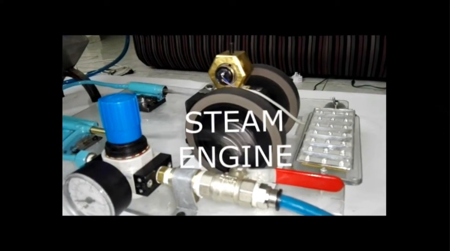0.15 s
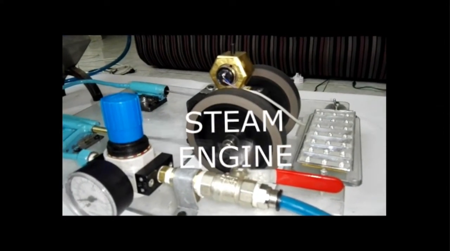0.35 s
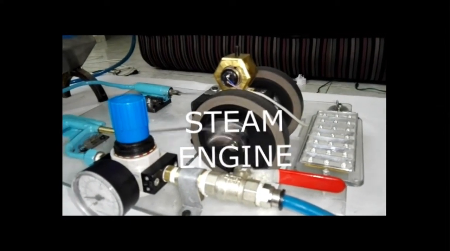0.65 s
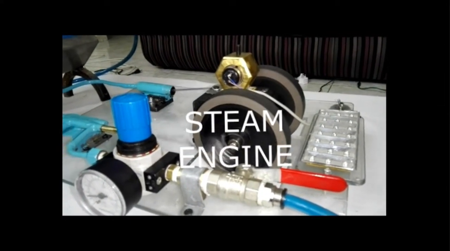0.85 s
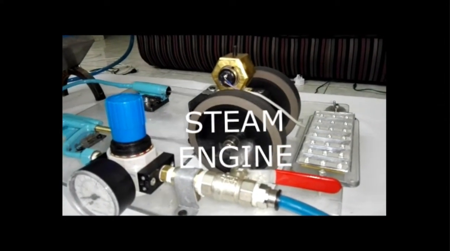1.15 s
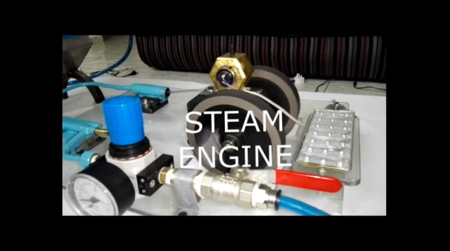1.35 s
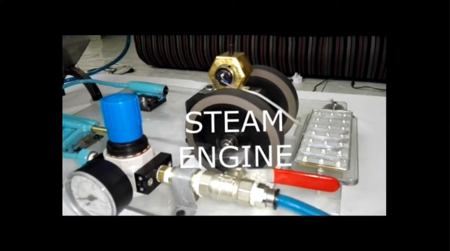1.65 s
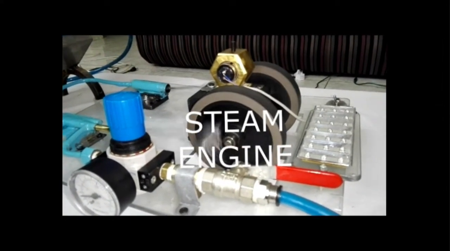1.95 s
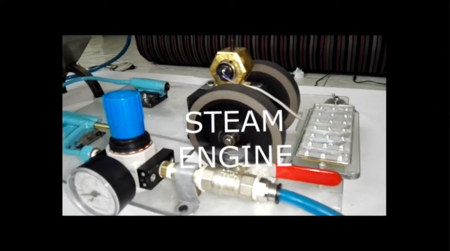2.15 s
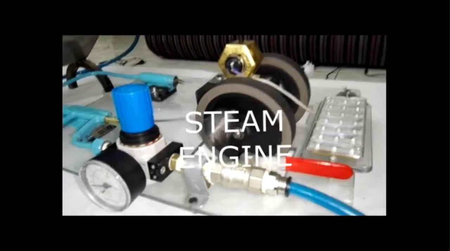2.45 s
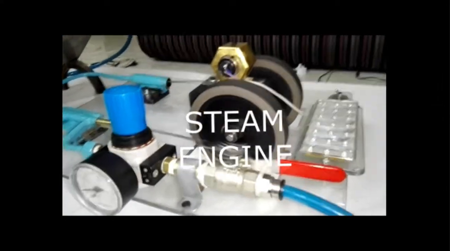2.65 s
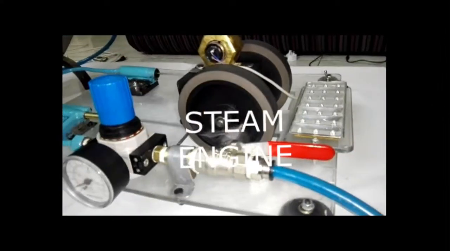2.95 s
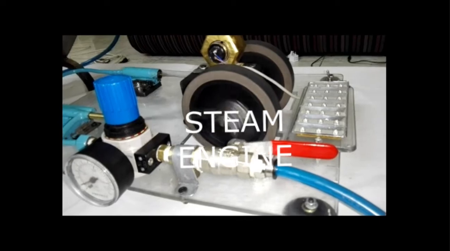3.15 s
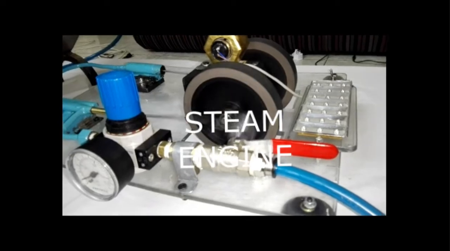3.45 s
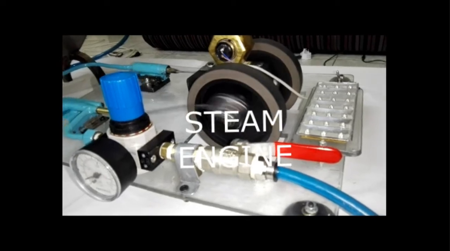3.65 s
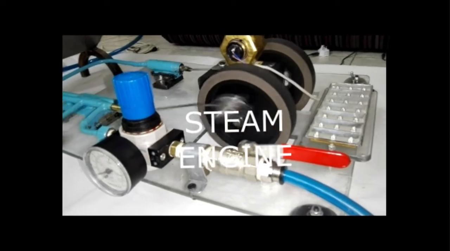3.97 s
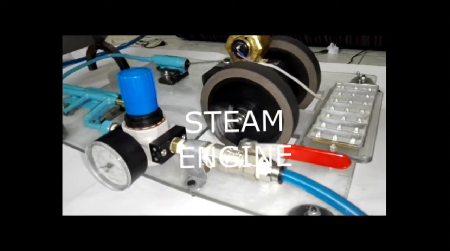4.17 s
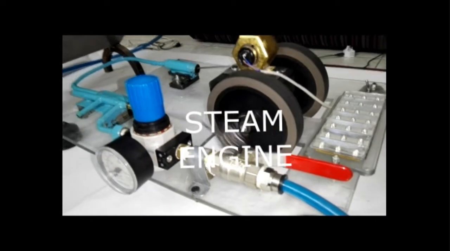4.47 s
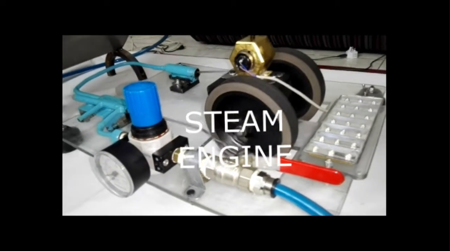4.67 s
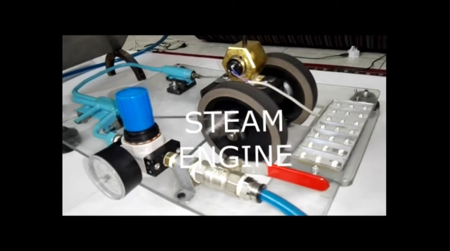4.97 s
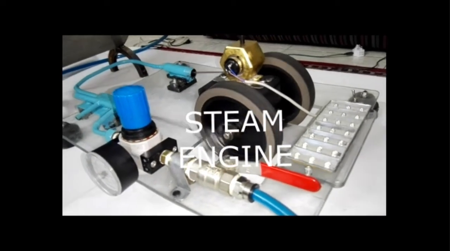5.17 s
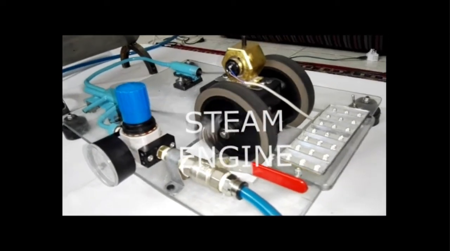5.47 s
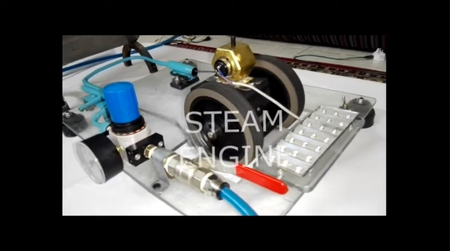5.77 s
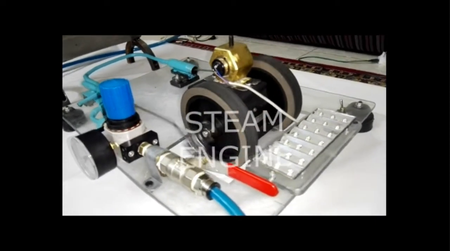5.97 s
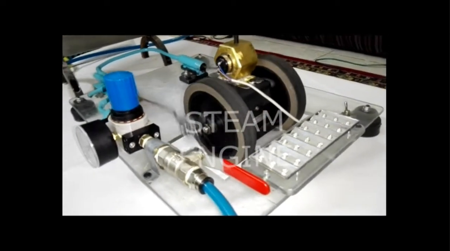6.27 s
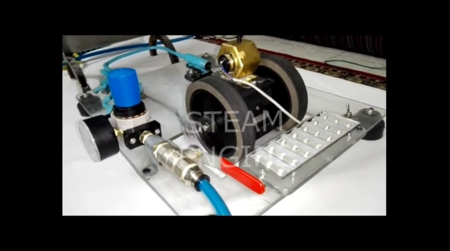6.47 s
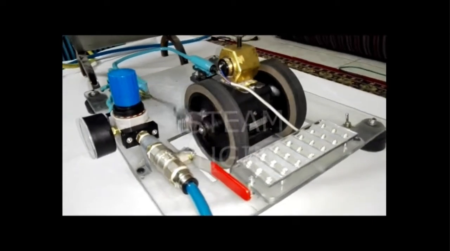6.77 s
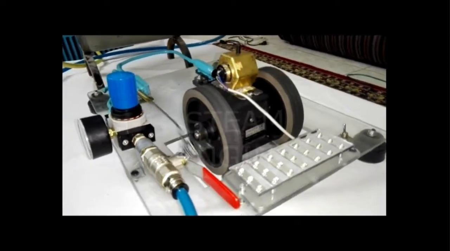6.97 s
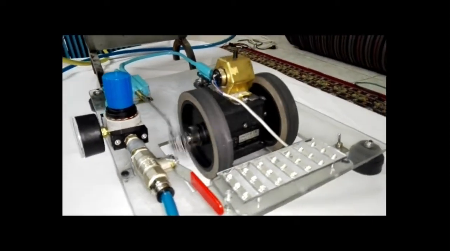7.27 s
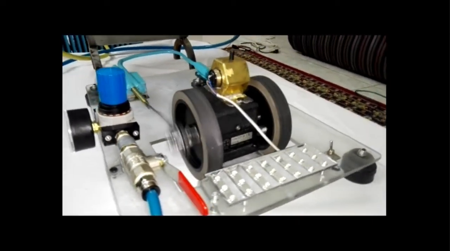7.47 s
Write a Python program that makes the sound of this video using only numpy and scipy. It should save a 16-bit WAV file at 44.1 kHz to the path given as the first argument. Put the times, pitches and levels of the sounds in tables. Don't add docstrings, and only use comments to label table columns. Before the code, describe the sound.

Close up on a table in a small room, a miniature piston engine runs fast, each turn a tick, a hissing puff and a tock, with a loud deep compressor hum and air leak. Before three seconds a hard cut removes the hum; the engine continues slower, about six puffs a second, with crisp knocks, light rattle and faint hiss, until the end.

```python
import sys
import numpy as np
from scipy import signal
from scipy.fft import rfft, irfft
from scipy.io import wavfile
from scipy.ndimage import uniform_filter1d

SR = 44100
rng = np.random.default_rng(int(sys.argv[2]) if len(sys.argv) > 2 else 0)


def invert_db(x):
    u = np.asarray(x, float) / 20
    return 10 ** u


def digitize_waveform(pressure):
    field = np.atleast_2d(pressure).T
    bounded = np.clip(field, -1, 1)
    quanta = np.round(bounded * 32767).astype(np.int16)
    wavfile.write(sys.argv[1], SR, quanta)


N = 336042

CHANGE_S, CHANGE_FADE_S = 2.643, 0.011

# (multiple of the shaft speed, level [dB rms]); the high ones are its casing ringing
HUM = [(1, -20), (2, -35.5), (4, -46.5), (5, -51.5), (6, -56.5), (8, -55), (18, -51.5), (21, -52),
       (22, -54), (26, -43), (27, -50), (28, -51), (29, -44.5), (30, -56)]
HUM_HZ, HUM_START_TURN, HUM_LAG_RAD = 59.54, .393, .5
# (frequency [Hz], level [dB per Hz])
FAST_RUMBLE = [(15, 9), (45, -1), (90, 3), (130, -5), (200, -14), (300, -59)]
SLOW_RUMBLE = [(12, -16), (25, -5.5), (60, -3.5), (130, -2), (200, -6), (300, -17.5), (400, -40)]
FAST_RUMBLE_DB, SLOW_RUMBLE_DB = -35.5, -43
# (frequency [Hz], level [dB per Hz])
FAST_LEAK = [(88, -31), (150, -1), (171, 0.5), (241, -9), (637, -13), (816, -14.5), (1420, -0.5),
             (1650, -3), (2920, -11), (3810, -12), (4690, -8.5), (9490, -12.5), (14200, -20.5)]
SLOW_LEAK = [(150, -47), (250, -14.5), (553, -11), (633, -36), (802, -18), (949, -14.5), (1350, -10),
             (1630, -2), (1960, -9), (2100, -27), (3200, -14), (6620, -12), (9760, -13), (14200, -20)]
FAST_LEAK_DB, SLOW_LEAK_DB = -33, -37.5
# (time [s], level [dB])
WHINE = [(4.8, -80), (5.5, -62), (6.8, -56), (7.6, -57)]
WHINE_HZ = 807

# (first tick [s], number of ticks, [(turn number, length of a turn [ms])])
FAST_WHEEL = (-.0287, 22, [(0, 129.1), (12, 128.0), (20, 127.93)])
SLOW_WHEEL = (2.6379, 32, [(0, 161.5), (4, 161.65), (9, 161.45), (13, 160.9), (15, 160.35), (20, 159.9),
              (30, 159.78)])
# (time [s], tick [dB], tock [dB], puff [dB])
FAST_VIEW = [(0, -25, -24.5, -16.6), (1.3, -25.5, -25.5, -17.1), (2.1, -25, -25.3, -17),
             (2.7, -25, -24.6, -16.5)]
SLOW_VIEW = [(2.64, -23, -27.5, -21.5), (3.4, -24, -28.5, -22.5), (4.3, -22, -25, -20),
             (5.3, -21, -22.5, -19.5), (6.4, -21.5, -23, -19.5), (7.62, -24.5, -25.2, -20.5)]
KNOCK_SPREAD_DB, PUFF_SPREAD_DB, BRIGHT_SPREAD_DB = .5, 0.16, 1.25

# (place in the turn [turns], frequency [Hz], time to fade 60 dB [s], first [dB], last [dB])
VALVE = (.76, 4000, .014, -29, -31)
# (place in the turn [turns], frequency [Hz], level [dB], swell [ms], direction)
PUSHES = [(.125, 44, -32, 12, -1), (.36, 60, -36, 6, 1), (.755, 122, -34, 10, 1), (.94, 125, -39, 10, 1),
          (.535, 105, -40, 9, 1)]
# (first turn [dB], last turn [dB])
FAST_PUSH_DB = (-1, -2)
SLOW_PUSH_DB = (-1.5, -4)
# (place in the turn [turns], level [dB], width [turns])
RATTLE = [(.06, -1, 0.14), (.3, 3.3, 0.19), (.47, 5, .11), (0.679, 1.9, 0.092), (.84, -3.5, 0.069),
          (.99, 4.5, 0.13)]
# (frequency [Hz], width [Hz], level [dB])
FRAME = [(803, 75, -14.5), (1252, 135, -9.5), (1605, 173, -3), (1972, 130, -7), (2175, 420, -10.5),
         (2620, 780, -6.5)]
FAST_RATTLE_DB, SLOW_RATTLE_DB = -41, -39.5
REPEAT = 0.9

# (place [turns], level [dB], slope [dB per turn])
FAST_PORT = (.25, (.105, 3, -14, 130), (0.18, 2, -14, 45), (-.06, -15, 114))
SLOW_PORT = (.26, (.1, 2, -11.5, 125), (0.1657, 2.5, -13.5, 71), (.015, -16.5, 140))
# (frequency [Hz], level [dB per Hz])
FAST_JET = [
    [(150, -40), (250, -9.5), (655, -12), (1290, -6), (1580, -11), (2000, -7), (2320, -3.5), (2940, -6),
     (3730, -5), (6290, -2), (9430, -1), (10400, -5.5), (11800, -6.5), (14200, -10)],
]
FRONT_JET = [(150, -43), (250, -10), (644, -14.5), (1180, -7.5), (1930, -7.5), (2280, -4), (2940, -9),
             (3660, -5.5), (4720, -6), (5500, -3.5), (6290, -5), (9760, -4.5), (14200, -13.5)]
HALF_JET = [(150, -42), (250, -8.5), (655, -12), (762, -13.5), (1240, -2), (1690, -8.5), (2530, 0),
            (3040, -8.5), (4640, -3.5), (5780, -2.5), (9120, 1), (13000, -3), (14200, -6)]
SIDE_JET = [(150, -46), (250, -12), (655, -21), (1180, -9), (2100, -12), (2490, -6.5), (2700, -6.5),
            (3660, -6.5), (4490, -1), (6400, -4.5), (6850, -9.5), (9930, -7.5), (14200, -10)]
# (frequency [Hz], width [Hz], level [dB])
NOZZLE = [
    (3636, 290, -24.5),
    (5300, 470, -17),
    (9500, 2600, -17),
]
# (frequency [Hz], width [Hz])
THROAT = (3754, 2080)
WHISTLE_DB = -4
SPITS_PER_S, SPIT_DB = 200, 3

# (frequency [Hz], first turn [dB], last turn [dB])
FAST_TICK = [(1152, -36, -34), (1350, -5, -12), (1648, 4.5, 3), (1792, 6.5, 1), (2170, -21, -15),
             (2138, 4.5, -1), (2160, -25, -24), (2680, -7, -9), (3200, -2, -6), (3830, -3, -3),
             (4220, -7, -7)]
FAST_TOCK = [(1200, -9, -5.5), (1325, -3, -5), (1634, 0, -2), (1870, -10, -12), (2194, 1, -2.5),
             (2383, 2.5, 0), (2690, -4.5, -8), (3230, -11, -12), (3420, -11, -20), (3902, -10, -10),
             (3990, -6, -10), (4080, -9, -11)]
SLOW_TICK = [(1300, -22, -14), (1490, -11, -7), (1622, 0, 0), (1930, -15, -5), (2200, -13, -20),
             (2330, -14, -18), (2565, -15, -3), (2725, -20, -15), (2970, -25, -17), (3200, -19, -15),
             (3970, -18, -19)]
SLOW_TOCK = [(1260, -14, -19), (1435, -17, -19), (1630, -11, -13), (1760, -7, -16), (1900, 0, 0),
             (2200, -12, -21), (2583, -20, -17), (2740, -12, -14), (3130, -13, -19), (3260, -14, -17),
             (3900, -21, -25)]
# (distance to -10 dB [ms], sharpness, skirt [dB], skirt slope [dB per ms])
TICK_BLOW = ((5.2, 1.9, -9.5, 0.91), (7.6, 3.1, -13.5, 1.1))
TOCK_BLOW = ((6.3, 4.2, -21, 3), (7.2, 4.5, -13, 0.88))
TOCK_TURN = .571
FAST_STRETCH, SLOW_STRETCH = 1.13, 0.81
CREEP = .024
# (frequency [Hz], level [dB per Hz])
SCRAPE = [(1000, -31), (2000, 8), (3300, -3), (4300, -5), (5600, -1), (7500, -9), (10000, -39)]
SCRAPE_DB = -14

EDGE_HZ = 14230
# (time [s], length [s], level below 3.5 kHz [dB], level above [dB])
DROPOUTS = [
    (5.4745, .0205, -26, -28),
    (4.988, .022, -2, -7),
    (4.9965, .007, 0, -14),
]
# (from [s], length [s], repeats, level step [dB])
HELD = (4.985, .0095, 2, -7.5)


def evened(x):
    return x / np.sqrt(np.mean(x ** 2) + 1e-20)


def read(points, at):
    return np.interp(at, *np.transpose(points))


def colour(points, hz):
    f, level_db = np.transpose(points)
    return np.interp(np.log(hz + 1), np.log(f + 1), level_db)


def add(mix, s, sound):
    at = round(s * SR)
    sound = sound[max(-at, 0):]
    part = mix[max(at, 0):][:len(sound)]
    part += sound[:len(part)]


def resonate(x, hz, width):
    return signal.lfilter(*signal.iirpeak(hz, hz / width, SR), x)


def swell(x, rise, fall):
    width, sharp, skirt_db, slope_db = (np.where(x < 0, a, b) for a, b in zip(rise, fall))
    top_db = -10 * (abs(x) / width) ** sharp
    return np.maximum(top_db, skirt_db - slope_db * np.maximum(abs(x) - width, 0))


def hiss(spectra, patchy_db, blend=np.zeros(N), tilt_db=np.zeros(N)):
    frames, hz = N // 128 + 5, np.fft.rfftfreq(512, 1 / SR)
    at = np.minimum(np.arange(frames) * 128, N - 1)
    a, b, patches = rng.standard_normal((frames, 257, 3)).T
    patches = evened(uniform_filter1d(uniform_filter1d(patches, 5, 0), 8, 1))
    weights = [np.maximum(1 - abs(blend[at] - k), 0) for k in range(len(spectra))]
    field_db = sum(colour(points, hz)[:, None] * w for points, w in zip(spectra, weights))
    lean = np.tanh(3.2 * np.log2(np.maximum(hz, 3200) / 6500))[:, None] / 2
    z = (a + 1j * b) * invert_db(field_db + lean * tilt_db[at] + patchy_db * patches)
    z /= np.sqrt(uniform_filter1d((abs(z) ** 2).mean(0), 60))
    return evened(signal.istft(z, nperseg=512, noverlap=384)[1][:N])


def rumble(points, size=N):
    gain = invert_db(colour(points, np.fft.rfftfreq(size, 1 / SR)))
    return evened(irfft(rfft(rng.standard_normal(size)) * gain, size))


def background():
    whine = evened(resonate(rng.standard_normal(N), WHINE_HZ, 7)) * invert_db(read(WHINE, np.arange(N) / SR))
    leak = invert_db(SLOW_LEAK_DB) * hiss([SLOW_LEAK], 3.25)
    return leak + invert_db(SLOW_RUMBLE_DB) * rumble(SLOW_RUMBLE) + whine


def compressor():
    angle = 2 * np.pi * (HUM_HZ * np.arange(N) / SR + HUM_START_TURN)
    wavers = evened(uniform_filter1d(rng.standard_normal((len(HUM), N // 64 + 2)), 40, 1))
    hum = np.zeros(N)
    for (k, db), waver in zip(HUM, wavers):
        waver_db = .5 * np.sqrt(k) * np.interp(np.arange(N) / 64, np.arange(len(waver)), waver)
        hum += invert_db(db + waver_db) * np.cos(k * angle - HUM_LAG_RAD * (k - 1))
    return np.sqrt(2) * hum + invert_db(FAST_RUMBLE_DB) * rumble(FAST_RUMBLE)


def valve(times):
    turn, hz, t60, start_db, end_db = VALVE
    out, t = np.zeros(N), np.arange(0, .02, 1 / SR)
    ping = np.sin(2 * np.pi * hz * t) * invert_db(-60 * t / t60) * np.minimum(t / .0015, 1)
    for s, length, db in zip(times, np.diff(times), np.linspace(start_db, end_db, len(times))):
        add(out, s + turn * length, invert_db(db) * ping)
    return out


def pushes(times, start_db, end_db):
    out, t = np.zeros(N), np.arange(0, .12, 1 / SR)
    chance = rng.standard_normal((len(times), len(PUSHES))) * 0.84
    chance += np.linspace(start_db, end_db, len(times))[:, None]
    for s, length, row in zip(times, np.diff(times), chance):
        for (turn, hz, db, swell_ms, direction), more_db in zip(PUSHES, row):
            u = t * 1000 / swell_ms
            swing = np.sin(2 * np.pi * hz * t) * u * np.exp(1 - u)
            add(out, s + turn * length, direction * invert_db(db + more_db) * swing)
    return out


def rattle(turn, samples):
    same = np.interp(turn * samples, np.arange(samples), rng.standard_normal(samples), period=samples)
    grit = np.sqrt(REPEAT) * evened(same) + np.sqrt(1 - REPEAT) * rng.standard_normal(N)
    grit *= sum(invert_db(db - 10 * ((turn - at) / width) ** 2) for at, db, width in RATTLE)
    out = np.zeros(N)
    for hz, width, db in FRAME:
        ring = resonate(resonate(grit, hz, 1.5 * width), hz, 1.5 * width)
        out += invert_db(db) * ring / np.sqrt(width)
    return evened(out)


def exhaust(turns, s, length, puff_db, bright_db, jets, port):
    t = np.arange(N) / SR
    open_turn, rise, fall, (inlet_turn, inlet_db, inlet_slope_db) = port
    peak = s[:-1] + open_turn * length
    side = np.clip(1.18 * turns / len(s) - .1, 0, 1) * (len(jets) - 1)
    air = hiss(jets, 0.93, side, np.interp(t, peak, bright_db))
    air = evened(air + sum(invert_db(db) * evened(resonate(air, hz, width)) for hz, width, db in NOZZLE))
    flutter_db = 0.89 * evened(uniform_filter1d(rng.standard_normal(N), 70))
    spits = (rng.random(N) < SPITS_PER_S / SR) * rng.standard_normal(N)
    air = air + invert_db(SPIT_DB) * signal.lfilter([1, -1.4, .4], [1, -.2, .3], spits)
    from_inlet = abs((turns - inlet_turn + .5) % 1 - .5)
    port_db = np.maximum(swell(turns % 1 - open_turn, rise, fall), inlet_db - inlet_slope_db * from_inlet)
    air = air + invert_db(WHISTLE_DB + port_db) * resonate(resonate(air, *THROAT), *THROAT)
    return air * invert_db(np.interp(t, peak, puff_db) + port_db + flutter_db + 0.99)


def blows(times, levels_db, modes, shape, stretch, spread, creep=0):
    hz, start_db, end_db = np.transpose(modes)
    t, out = np.arange(-.02, .034, 1 / SR), np.zeros(N)
    phase = spread * rng.uniform(-0.86, 1, len(hz))
    chance = rng.standard_normal((len(times), 2, len(hz)))
    uneven = evened(uniform_filter1d(rng.standard_normal((len(hz), len(t))), 150, 1))
    depth_db = .5 + 17 * (stretch - 1) - .15 * (start_db + end_db)[:, None] / 2
    uneven_gain = invert_db(depth_db * np.clip(uneven, -2.5, 1.3))
    main = start_db == start_db.max()
    for k, (s, db) in enumerate(zip(times, levels_db)):
        done = k / len(times)
        mode_db = start_db + (end_db - start_db) * done + 0.69 * chance[k, 0]
        mode_hz = hz * (1 + creep * done * main)
        mode_phase = phase + 0.32 * stretch ** 2 * chance[k, 1]
        tones = np.cos(2 * np.pi * mode_hz[:, None] * t + mode_phase[:, None])
        ring = evened(invert_db(mode_db) @ (uneven_gain * tones))
        ring = ring + invert_db(SCRAPE_DB) * rumble(SCRAPE, size=len(t))
        ring *= invert_db(swell(t * 1000 / stretch, *shape))
        add(out, s + t[0], invert_db(db) * ring / np.std(ring[abs(t) < .006]))
    return out


def engine(wheel, view, tick, tock, jets, port, stretch, rattle_db, push_db, creep=0):
    first_s, count, turn_ms = wheel
    length = read(turn_ms, np.arange(count - 1)) / 1000
    s = first_s + np.append(0, np.cumsum(length))
    turns = np.interp(np.arange(N) / SR, s, np.arange(count))
    view_s, *levels = np.transpose(view)
    spread_db = [KNOCK_SPREAD_DB, KNOCK_SPREAD_DB, PUFF_SPREAD_DB, BRIGHT_SPREAD_DB]
    chance = rng.standard_normal((count, 4)) * spread_db
    tick_db, tock_db, puff_db = np.array([np.interp(s, view_s, db) for db in levels]) + chance.T[:-1]
    out = valve(s) + pushes(s, *push_db)
    out += invert_db(rattle_db) * rattle(turns % 1, round(length.mean() * SR))
    out += exhaust(turns, s, length, puff_db[:-1], chance[:-1, -1], jets, port)
    out += blows(s, tick_db, tick, TICK_BLOW, stretch, spread=2.6 * stretch)
    tock_s = s[:-1] + TOCK_TURN * length
    out += blows(tock_s, tock_db[:-1], tock, TOCK_BLOW, stretch, spread=np.pi, creep=creep)
    return out


def scene():
    fast = compressor() + invert_db(FAST_LEAK_DB) * hiss([FAST_LEAK], 2.3)
    fast += engine(FAST_WHEEL, FAST_VIEW, FAST_TICK, FAST_TOCK, FAST_JET, FAST_PORT,
                   FAST_STRETCH, FAST_RATTLE_DB, FAST_PUSH_DB)
    slow = background()
    slow += engine(SLOW_WHEEL, SLOW_VIEW, SLOW_TICK, SLOW_TOCK, [FRONT_JET, HALF_JET, SIDE_JET],
                   SLOW_PORT, SLOW_STRETCH, SLOW_RATTLE_DB, SLOW_PUSH_DB, CREEP)
    fade = np.clip((np.arange(N) / SR - CHANGE_S) / CHANGE_FADE_S + .5, 0, 1)
    return (fast * (1 - fade) + slow * fade)[None]


def low_pass(x):
    return signal.sosfilt(signal.butter(12, 14630, fs=SR, output="sos"), x)


def record(dry):
    edge = signal.firwin(401, EDGE_HZ, window=("kaiser", 9), fs=SR)
    dry = signal.oaconvolve(dry, edge[None], "same")
    low = signal.oaconvolve(dry, signal.firwin(255, 3500, fs=SR)[None], "same")
    low_db, high_db, t = np.zeros(N), np.zeros(N), np.arange(N) / SR
    for s, length, below_db, above_db in DROPOUTS:
        gap = uniform_filter1d(1. * ((t > s) & (t < s + length)), 60)
        low_db += below_db * gap
        high_db += above_db * gap
    out = low * invert_db(low_db) + (dry - low) * invert_db(high_db)
    s, length, repeats, step_db = HELD
    piece = low[0, round(s * SR):round((s + length) * SR)]
    piece = piece * signal.windows.tukey(len(piece), .3)
    for k in range(1, repeats + 1):
        add(out[0], s + k * length, invert_db(k * step_db) * piece)
    return low_pass(out)


dry = scene()
out = record(dry)
digitize_waveform(out)
```